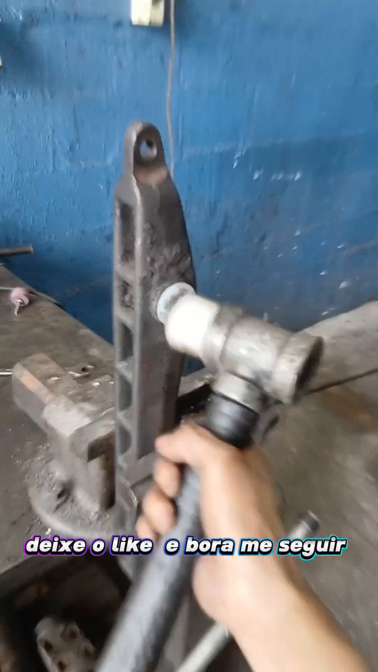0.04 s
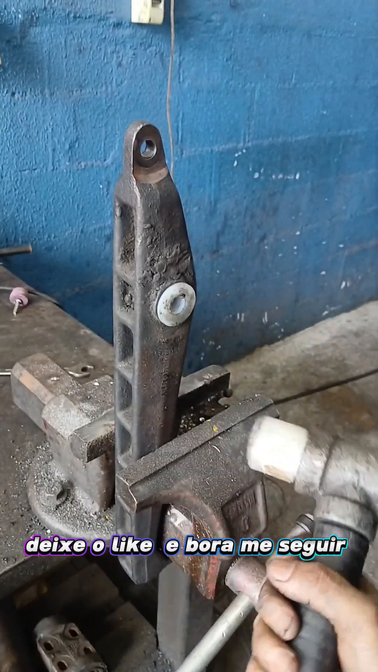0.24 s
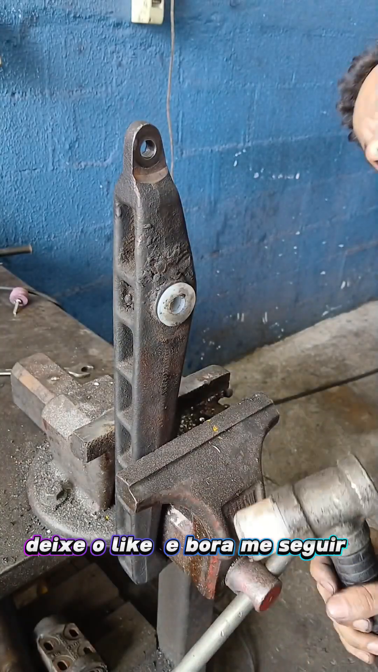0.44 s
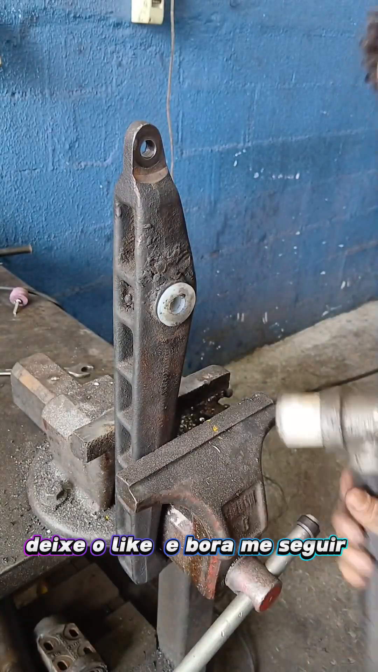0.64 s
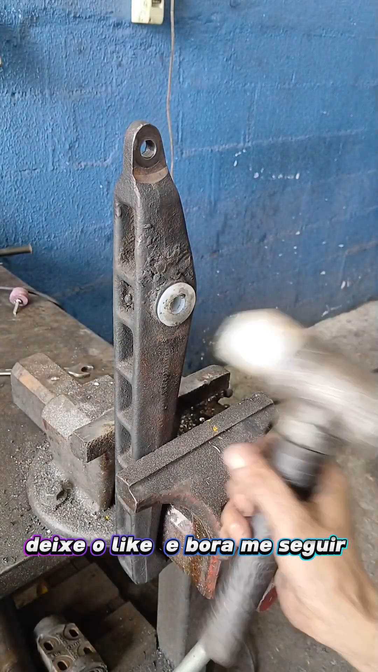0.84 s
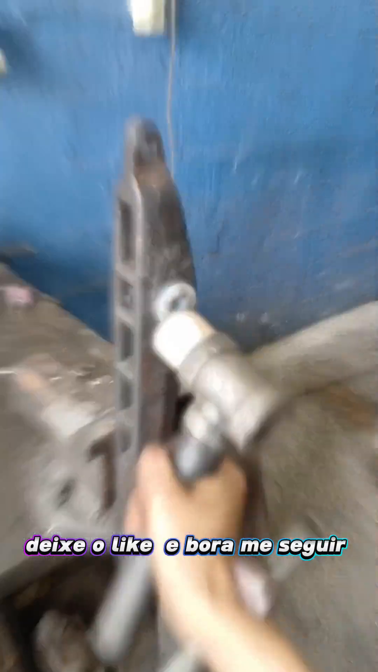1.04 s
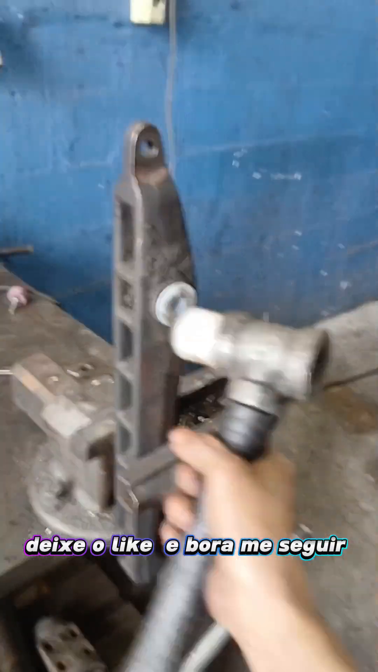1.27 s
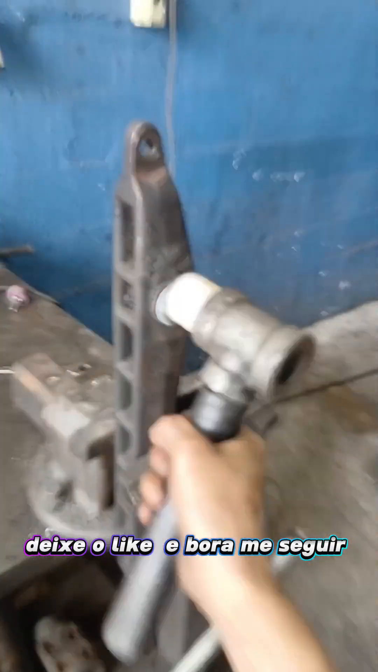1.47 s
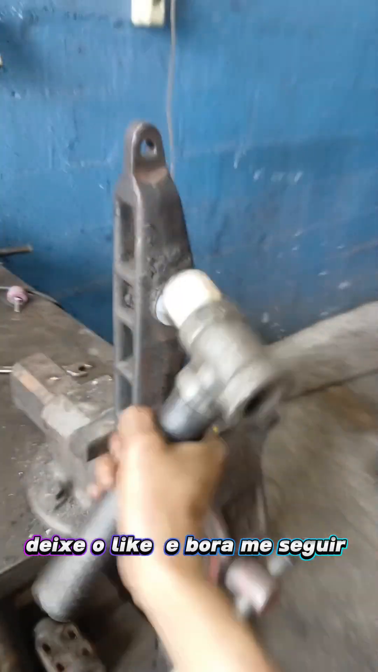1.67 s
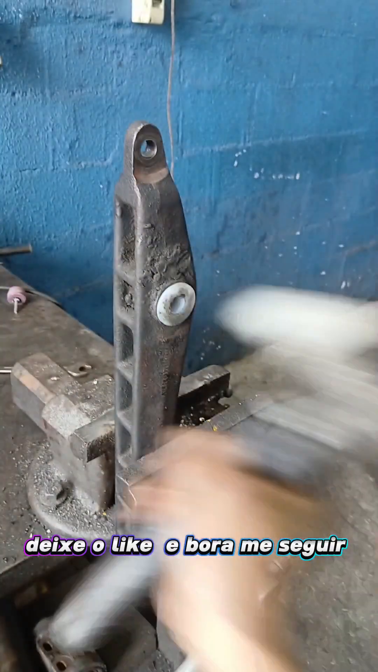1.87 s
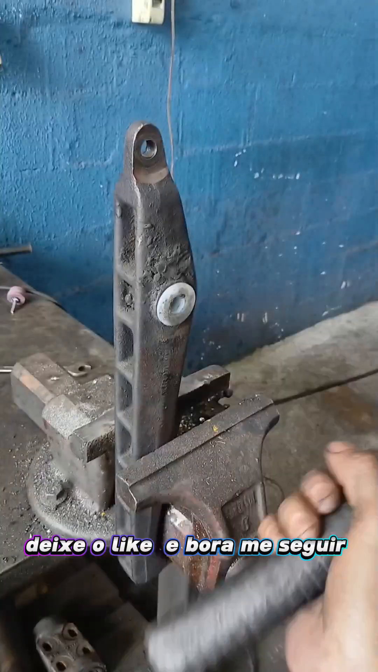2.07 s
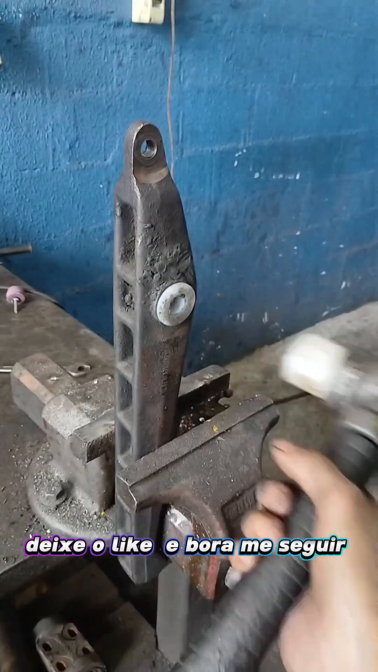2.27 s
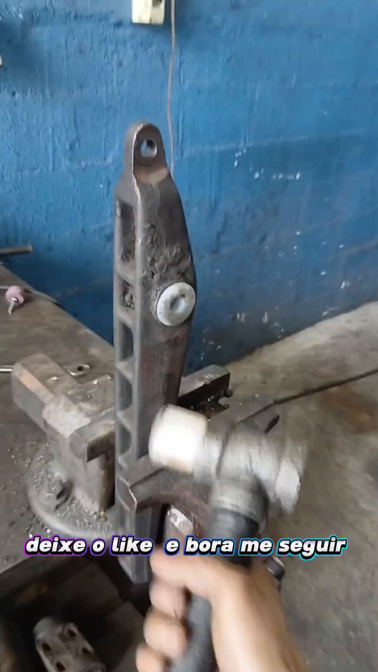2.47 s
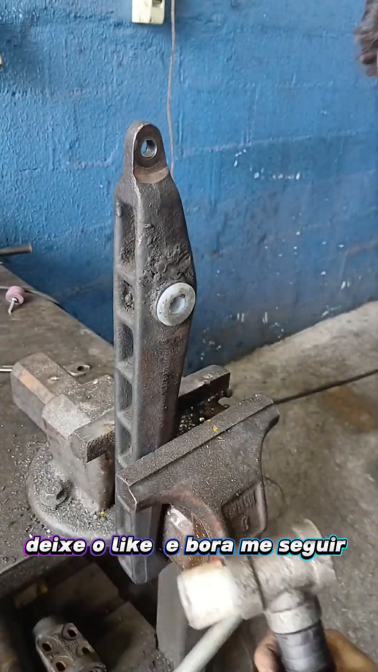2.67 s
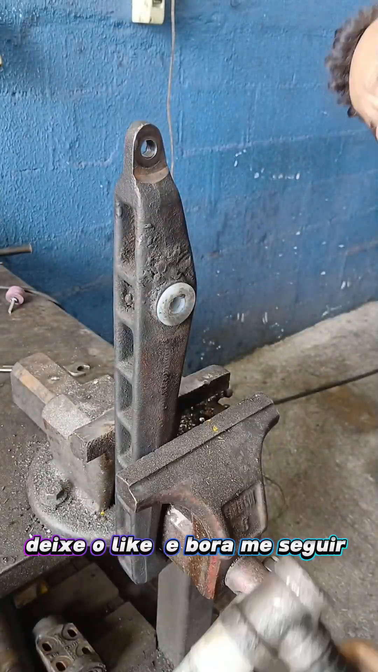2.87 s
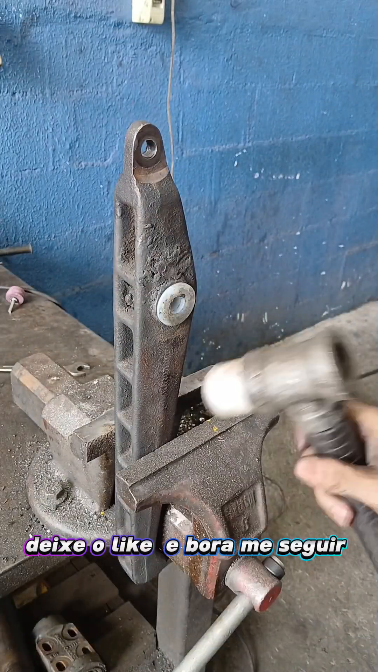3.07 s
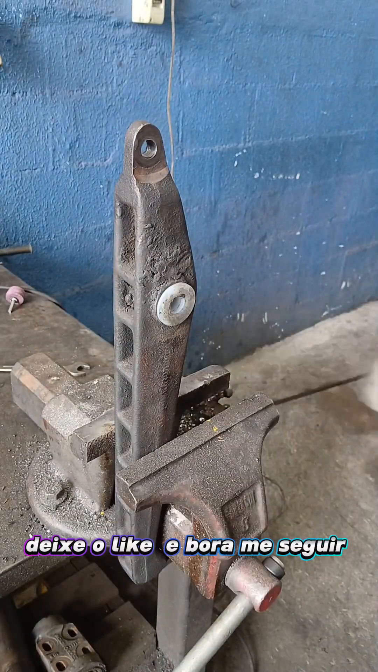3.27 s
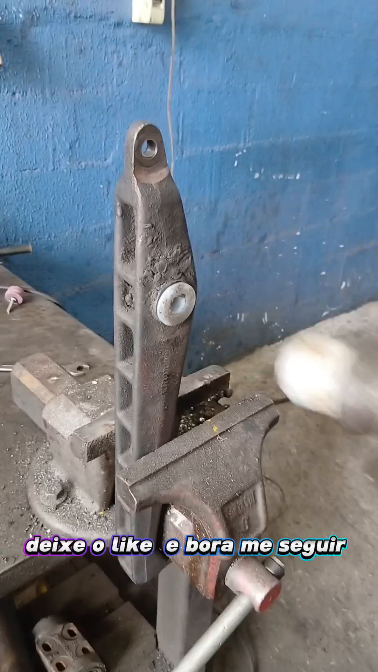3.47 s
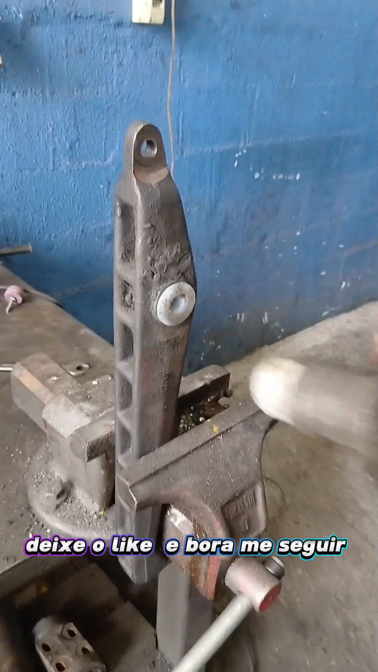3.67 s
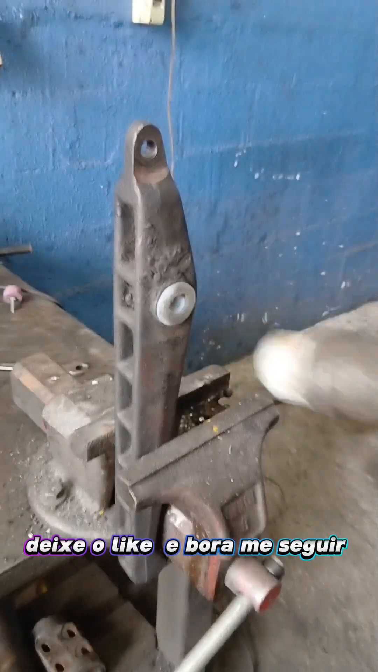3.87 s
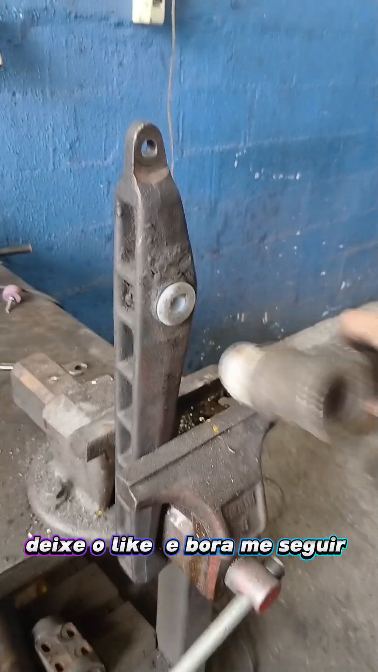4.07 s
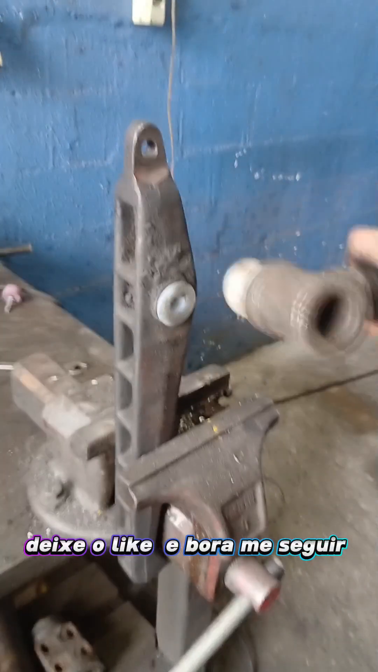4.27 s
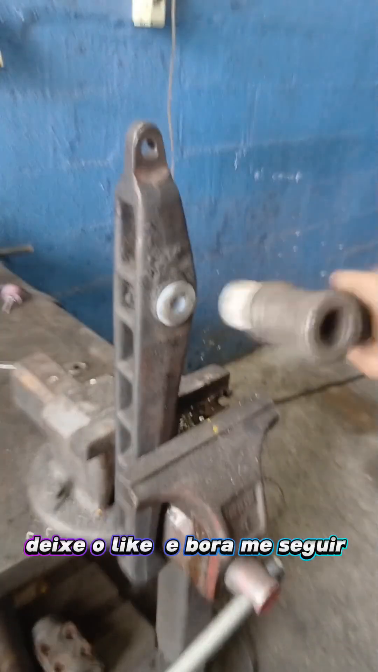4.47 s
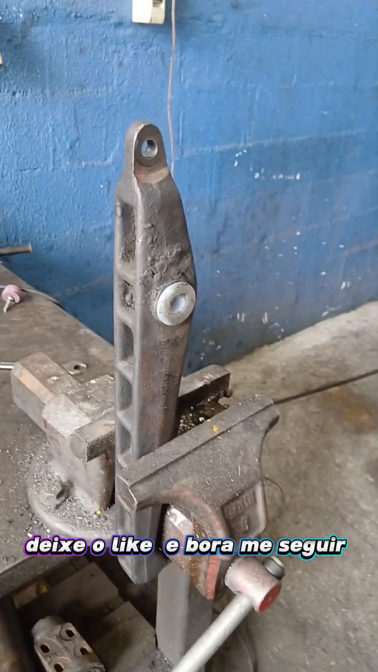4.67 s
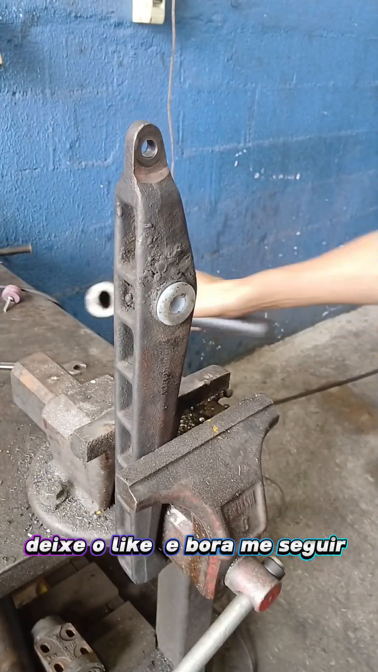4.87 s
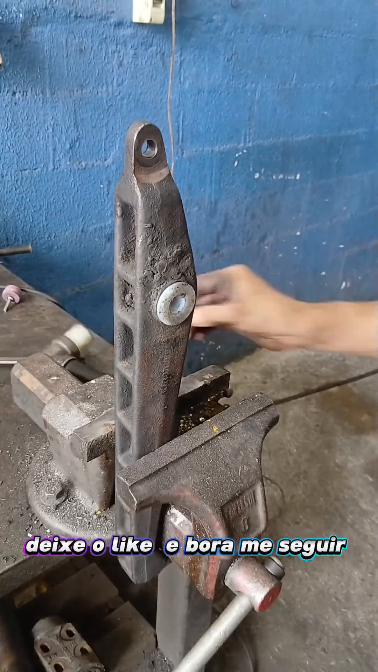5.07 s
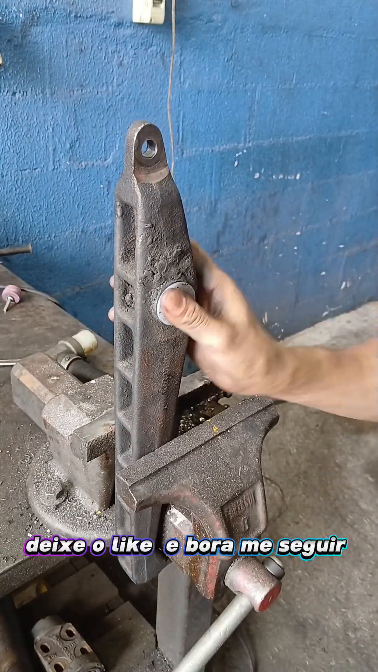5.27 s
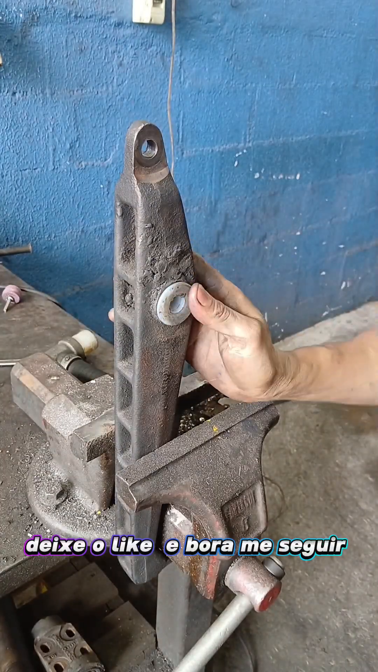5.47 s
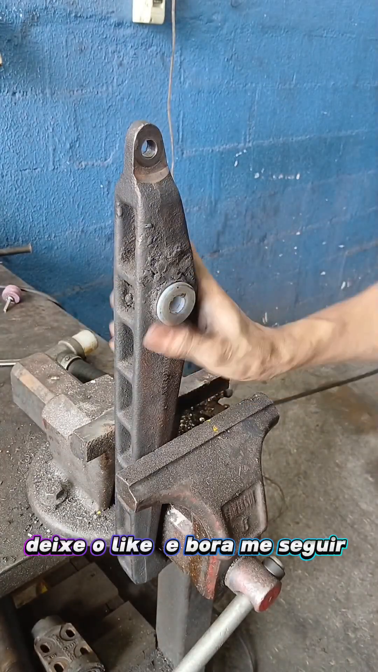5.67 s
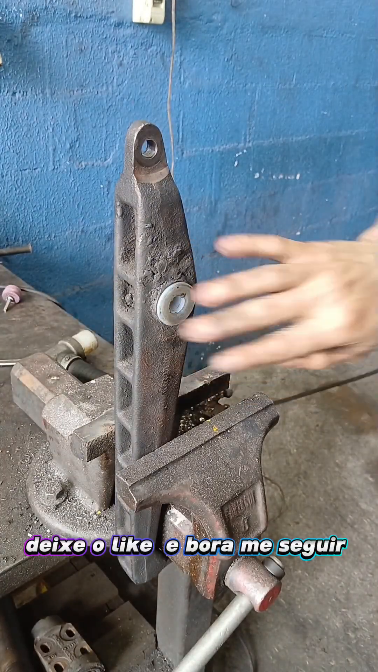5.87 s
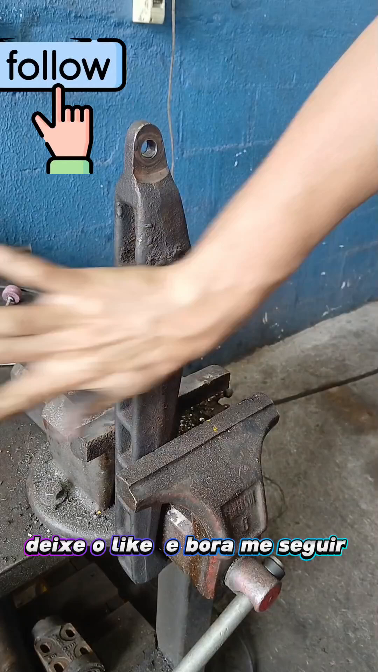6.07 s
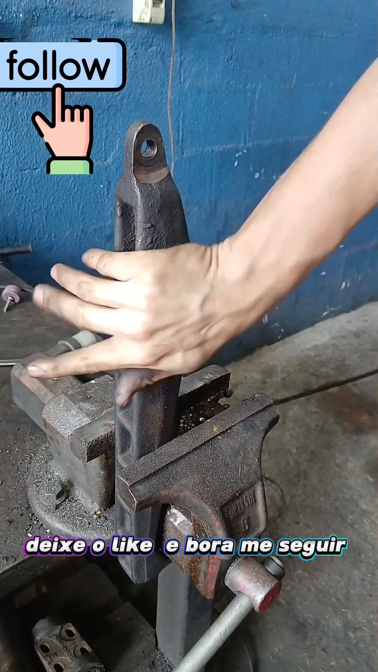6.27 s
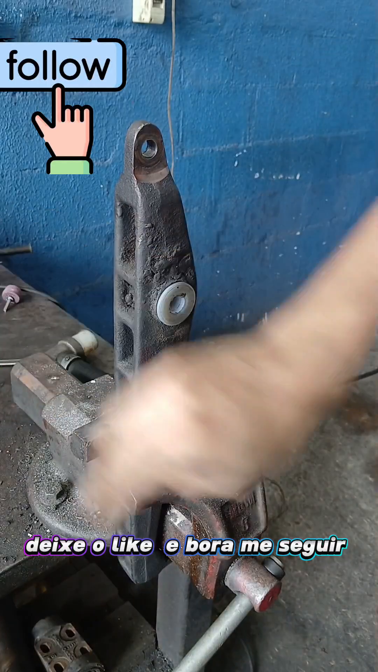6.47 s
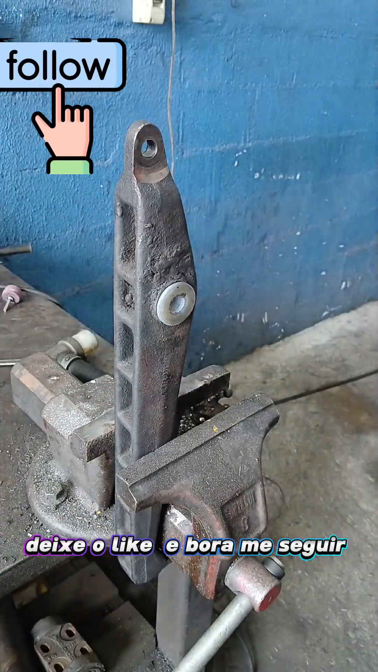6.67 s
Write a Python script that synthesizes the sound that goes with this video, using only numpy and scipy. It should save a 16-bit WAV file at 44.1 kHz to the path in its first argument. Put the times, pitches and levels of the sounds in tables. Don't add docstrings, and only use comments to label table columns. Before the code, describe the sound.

Hard, ringing hammer knocks in a reverberant workshop, one blow then two quick series, followed by a faint tool clatter and low machine hum.

```python
import sys
import numpy as np
from scipy import signal
from scipy.io import wavfile
from scipy.ndimage import uniform_filter1d

SR = 44100
rng = np.random.default_rng(int(sys.argv[2]) if len(sys.argv) > 2 else 0)


def linear_from_db(decibels):
    return 10 ** (np.asarray(decibels, float) / 20)


def digitize_waveform(pressure):
    field = np.atleast_2d(pressure).T
    bounded = np.clip(field, -1, 1)
    quanta = np.round(bounded * 32767).astype(np.int16)
    wavfile.write(sys.argv[1], SR, quanta)


N = 297234
TAIL = 30000
RING = TAIL // 3

# (time [s], level [dB], low head ring [dB], high head ring [dB], dry tock [dB])
BLOWS = [(-.012, -29.5, 4, -7, 3.5), (1.0404, -28.5, 2, 2.5, -2.5), (1.2429, -29, 1.5, 10, -1.5),
         (1.4637, -29.5, 3, -14, -1), (1.6872, -29.5, -9, -11.5, -2.5), (1.9232, -27.5, 3, -2, -2.5),
         (2.1721, -29.5, -2, -14, 2.5), (2.3936, -28, 4, -9, 1), (3.377, -27, 2, -2, -3),
         (3.587, -29, -2, -16, 0), (3.7889, -28.5, 3, -12, 3), (3.9976, -28, 4, 0.5, 0),
         (4.2104, -28, 3, -5, -0.5), (4.4426, -28, 1.5, -4, -7.5)]
# (time [s], level [dB], brightness [dB])
TOUCHES = [(5.0172, -54.5, -9), (5.0192, -48.5, 1.5), (5.027, -50.5, -3), (5.039, -54, -10),
           (5.050, -63, -6), (5.059, -51, -8), (5.077, -64.5, 13.5), (5.108, -62, 11), (5.126, -64.5, 16.5),
           (5.129, -62.5, 12), (5.137, -74.5, 17)]
# (frequency [Hz], level over click [dB], T60 [s])
TOCK_MODES = [(1420, 9, 0.011), (2453, 12.5, 0.0022), (3470, 13, 0.0135)]
# (frequency [Hz], level over click [dB], T60 [s])
ARM_MODES = [(155, 3, .06), (190, 7, .06), (345, 1, .05), (662, -1, .04), (812, -2, .04), (968, -2, .04),
             (1045, -2, .03), (3390, -4, .02)]
# (frequency [Hz], level over click [dB], T60 [s])
JAW_MODES = [(1259, 0.75, 0.087), (1330, 2.1, 0.038), (1408, 4.2, 0.076), (1445, 4.6, 0.097),
             (1603, 2.57, 0.027)]
# (frequency [Hz], level over click [dB], T60 [s])
HEAD_MODES = [(8152, 7, .035), (12975, 15, .055)]
# (frequency [Hz], level over click [dB], T60 [s])
BENCH_MODES = [(1020, 2, .03), (1670, 3, 0.043), (3100, -7, .012), (4330, -7, 0.0065), (11100, -3, 0.048),
               (11770, 2, 0.072), (12300, 13, .04)]
# (frequency [Hz], density [dB per Hz])
ROOM_COLOUR = [(30, -29), (80, -27), (130, -1.5), (200, -3), (300, -5), (500, -7), (1000, -5.5),
               (1600, -3.5), (2200, -4.5), (4500, -2.5), (6500, -9.5), (9000, -11), (12000, -17),
               (15500, -16)]
# (frequency [Hz], T60 [s])
ROOM_T60 = [(50, 0.63), (120, 0.34), (300, 0.9), (1000, .46), (3000, 0.44), (7000, 0.36), (15000, 0.23)]
# (frequency [Hz], likeness [0-1])
ROOM_LIKENESS = [(60, 0.3), (130, 0.5), (250, 0.78), (550, 0.73), (1100, 0.67), (2000, 0.021), (15000, .01)]
# (frequency [Hz], left minus right [dB])
ROOM_BALANCE = [(60, -11), (180, -0.5), (550, -0.5), (1650, -2), (4970, -3.5), (15000, -7.5)]
# (frequency [Hz], density [dB per Hz])
AIR_COLOUR = [(18, -71), (30, -58), (97, -17), (133, -11), (192, -5), (237, -5.5), (389, -16.5), (505, -5),
              (606, -24.5), (787, -11), (1870, -13.5), (2990, -13.5), (8060, -26), (15500, -40)]
# (frequency [Hz], likeness [0-1])
AIR_LIKENESS = [(60, 0.89), (180, 1), (550, 0.85), (1650, 0.082), (4970, 0.0064), (15000, 0.21)]
# (frequency [Hz], left minus right [dB])
AIR_BALANCE = [(60, -2), (240, -1), (950, -1.0), (3770, -3), (15000, -6.5)]
# (frequency [Hz], width [Hz], level [dB rms])
HUM = [(118.8, 3.1, -73), (149.8, 2.0, -63), (239.8, 0.95, -60), (314, 4.6, -71), (506, 1.67, -73),
       (800, 4, -75), (875, 5.5, -78)]
EDGES_HZ = 28 * 2 ** np.arange(0, 9.6, .5)


def mallet(rooms):
    thump_db, thump_per_s_db = -3.7, -0.58
    jaw_db, jaw_follows_tock = -2.5, .1
    knock_db = -11
    out = np.zeros((2, N))
    soft_face = signal.butter(2, [1850, 3200], "band", fs=SR, output="sos")
    knock = signal.butter(2, [1000, 6000], "band", fs=SR, output="sos")
    for s, level_db, low_ring_db, high_ring_db, tock_db in BLOWS:
        head = louder(HEAD_MODES[:1], low_ring_db) + louder(HEAD_MODES[1:], high_ring_db)
        jaw = louder(JAW_MODES, jaw_db + jaw_follows_tock * tock_db)
        ringing = struck(ARM_MODES + jaw + head, spread_db=2.5)
        body = shelf(ringing, 470, "low", thump_db + thump_per_s_db * s)
        contact = np.roll(struck(TOCK_MODES, spread_db=2.0), 14)
        tock = signal.sosfilt(soft_face, contact) + linear_from_db(knock_db) * signal.sosfilt(knock, contact)
        direct = linear_from_db(tock_db) * tock
        add(out, s - .0003, linear_from_db(level_db) * tick())
        add(out, s, linear_from_db(level_db - 8.6) * heard(body, linear_from_db(17.5) * direct, rooms, pan_db=-2.5))
    return out


def tick():
    level_db, t60_s = -11.5, .0035
    t = np.arange(300) / SR
    envelope_db = level_db + 1.5 * rng.standard_normal() - 60 * t / t60_s
    crackle = rng.standard_normal((2, 300)) * linear_from_db(envelope_db)
    bright = signal.butter(2, [7000, 16000], "band", fs=SR, output="sos")
    return signal.sosfilt(bright, crackle + crackle[::-1] / 2)


def struck(modes, spread_db):
    hz, level_db, t60_s = np.array(modes).T[:, :, None]
    t = np.arange(RING) / SR
    hit_db = level_db + spread_db * rng.standard_normal(hz.shape)
    height = linear_from_db(hit_db) * 2 * np.log(1000) / (t60_s * SR)
    out = np.sum(height * linear_from_db(-60 * t / t60_s) * np.cos(2 * np.pi * hz * t), axis=0)
    out[0] = 1
    return out


def louder(modes, db):
    return [(hz, level_db + db, t60_s) for hz, level_db, t60_s in modes]


def laying_down(rooms):
    boom_hz, boom_db = 342, -8.5
    out = np.zeros((2, N))
    weightless = signal.butter(4, 850, "high", fs=SR, output="sos")
    for s, level_db, bright_db in TOUCHES:
        contacts = rng.standard_normal(1000) * (rng.random(1000) < .3)
        rattle = contacts * linear_from_db(-60 * np.arange(1000) / SR / .03)
        clatter = np.convolve(struck(BENCH_MODES, spread_db=1.5), rattle)[:RING]
        boom = signal.lfilter(*signal.iirpeak(boom_hz, 4.0, fs=SR), clatter)
        body = signal.sosfilt(weightless, clatter) + linear_from_db(boom_db) * boom
        body = shelf(body, 6500, "high", bright_db)
        direct = linear_from_db(34.0) * shelf(body, 9500, "high", -22.0)
        add(out, s, linear_from_db(level_db) * heard(body, direct, rooms, pan_db=-2.0))
    return linear_from_db(-10) * out


def rustle():
    land_s, rise_s, level_db = 5.017, 0.11, -70
    ahead_s = land_s - np.arange(N) / SR
    cloth = signal.butter(2, [2600, 11000], "band", fs=SR, output="sos")
    swish = signal.sosfilt(cloth, rng.standard_normal((2, N)))
    return linear_from_db(level_db) * rms_one(swish) * (ahead_s > 0) / (1 + (ahead_s / rise_s) ** 4)


def heard(source, direct, rooms, pan_db):
    left_lag = 2
    shares = rms_one(rng.standard_normal(4)) / 2
    tail, early = [np.tensordot(shares, versions, axes=1) for versions in rooms]
    early[0, left_lag], early[1, 0] = 1, 1
    wet = signal.fftconvolve(tail, source[None], axes=1)[:, :TAIL]
    near = top_cut(signal.fftconvolve(early, direct[None], axes=1))
    near = near * linear_from_db(pan_db * np.array([[.5], [-.5]]))
    wet[:, :near.shape[1]] += near
    return wet


def near_surfaces(per_s=900, echo_db=-10, t60_s=0.13):
    t = np.arange(4000) / SR
    arrives = (rng.random((2, 4000)) < per_s / SR) * (t > .002)
    return arrives * rng.standard_normal((2, 4000)) * linear_from_db(echo_db - 60 * t / t60_s)


def workshop(build_s=0.0021, high_build_s=0.0092, low_build_cycles=0.39, room_db=-3):
    clot_db, clot_s = 2.5, .05
    t, out = np.arange(TAIL) / SR, 0
    white = rng.standard_normal((2, 2, TAIL))
    for hz, pair in stereo_bands(white, ROOM_COLOUR, ROOM_LIKENESS, ROOM_BALANCE):
        fill_s = build_s + low_build_cycles / hz + high_build_s * hz / 8000
        out = out + pair * (1 - np.exp(-t / fill_s)) * linear_from_db(-60 * t / at_hz(ROOM_T60, hz))
    clots = rms_one(uniform_filter1d(rng.standard_normal(TAIL), size=160))
    out = out * linear_from_db(clot_db * clots * np.exp(-t / clot_s))
    return top_cut(out) / np.sqrt(np.mean(out[:, :2000] ** 2)) * linear_from_db(room_db)


def background():
    air_db, swing_db, slip_rad = -55, 1.6, .3
    lead_rad = 0.11 * np.array([[1], [-1]])
    t = np.arange(N) / SR
    white = rng.standard_normal((2, 2, N))
    air = sum(pair for hz, pair in stereo_bands(white, AIR_COLOUR, AIR_LIKENESS, AIR_BALANCE))
    out = linear_from_db(air_db) * rms_one(top_cut(air))
    for hz, width_hz, level_db in HUM:
        r = np.exp(-2 * np.pi * width_hz / SR)
        waver = signal.lfilter([1], [1, -2 * r, r * r], rng.standard_normal((2, N + SR)))[:, SR:]
        swing, slip = waver / waver.std(axis=1, keepdims=True)
        phase = 2 * np.pi * hz * t + slip_rad * slip + lead_rad
        out += np.sqrt(2) * linear_from_db(level_db + swing_db * swing) * np.sin(phase)
    return out * linear_from_db(gain_db())


def gain_db():
    open_db, duck_db = -0.67, -12
    duck_s, hold_s, release_s = 0.13, 0.57, 0.23
    t = np.arange(N) / SR
    hits_s = np.array([row[0] for row in BLOWS + TOUCHES])
    since_s = t - hits_s[np.searchsorted(hits_s, t) - 1]
    held_db = duck_db * np.exp(-np.maximum(since_s - hold_s, 0) / release_s)
    r = np.exp(-1 / (duck_s * SR))
    return open_db + np.maximum(held_db, signal.lfilter([1 - r], [1, -r], held_db))


def stereo_bands(white, colour, likeness, balance):
    for k, (low, high) in enumerate(zip(EDGES_HZ, EDGES_HZ[1:])):
        band = signal.butter(2, [low, high], "band", fs=SR, output="sos")
        mid, side = signal.sosfilt(band, white[k % 2])
        hz = np.sqrt(low * high)
        alike = np.clip(at_hz(likeness, hz), 0, 1)
        pair = np.sqrt(1 + alike) * mid + np.sqrt(1 - alike) * side * [[1], [-1]]
        yield hz, pair * linear_from_db(at_hz(colour, hz) + at_hz(balance, hz) * np.array([[.5], [-.5]]))


def at_hz(points, hz):
    table_hz, value = np.array(points).T
    return np.interp(np.log(hz), np.log(table_hz), value)


def rms_one(x):
    return x / np.sqrt(np.mean(x ** 2) + 1e-20)


def shelf(x, hz, kind, db):
    return x + (linear_from_db(db) - 1) * signal.lfilter(*signal.butter(1, hz, kind, fs=SR), x)


def top_cut(x):
    return signal.sosfilt(signal.cheby2(10, 40, 15750 + 500, fs=SR, output="sos"), x)


def add(out, s, sound):
    start = round(s * SR)
    first = max(start, 0)
    part = sound[:, max(-start, 0):N - start]
    out[:, first:first + part.shape[1]] += part


def scene():
    rooms = [np.array([paths() for _ in range(4)]) for paths in (workshop, near_surfaces)]
    return mallet(rooms) + laying_down(rooms) + rustle() + background()


def roll_off(x):
    return signal.sosfilt(signal.butter(12, 16570, fs=SR, output="sos"), x)


def record(dry):
    mix = .12 * np.tanh(dry / 0.13)
    return roll_off(mix)


dry = scene()
out = record(dry)
digitize_waveform(out)
```